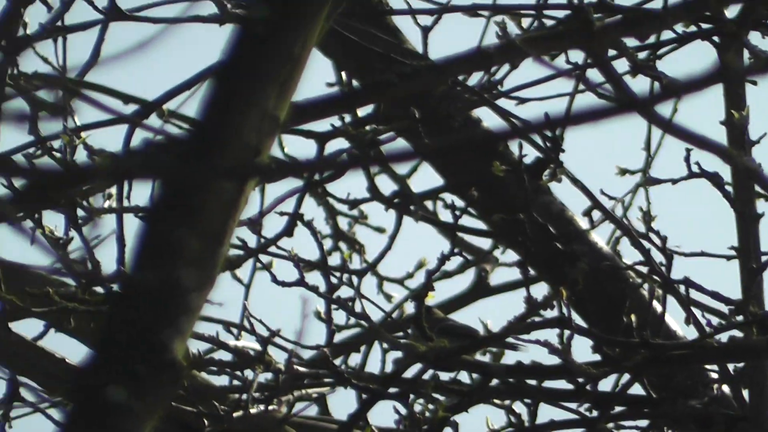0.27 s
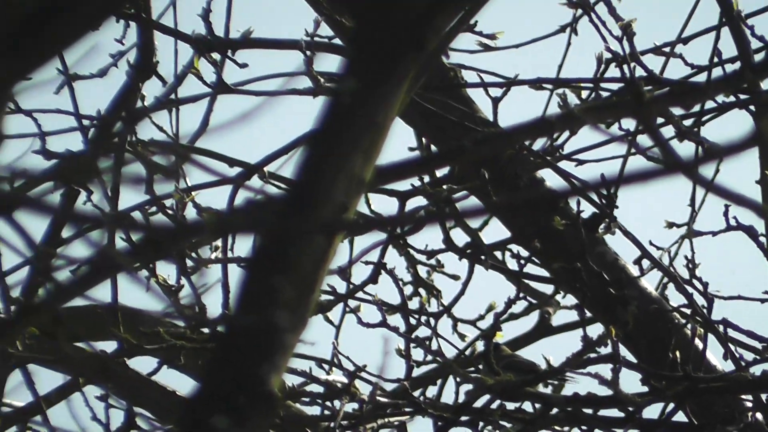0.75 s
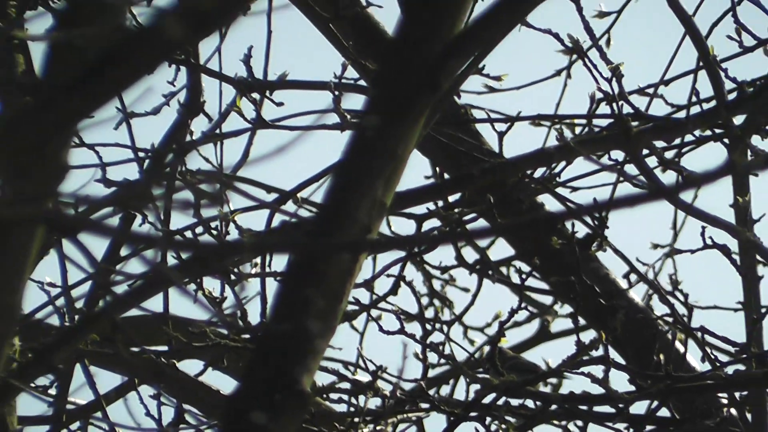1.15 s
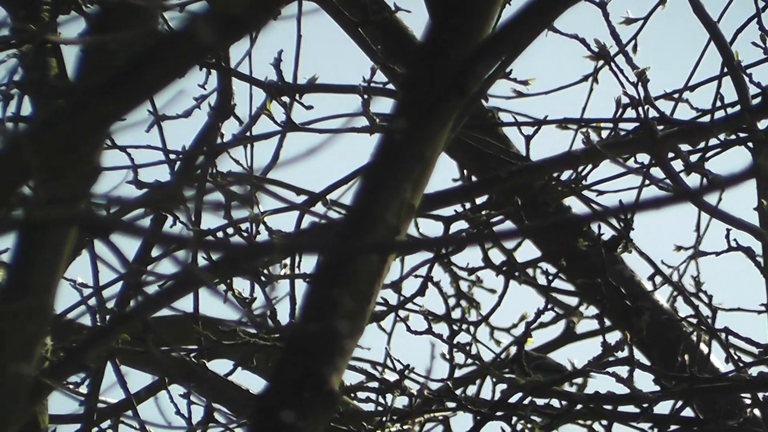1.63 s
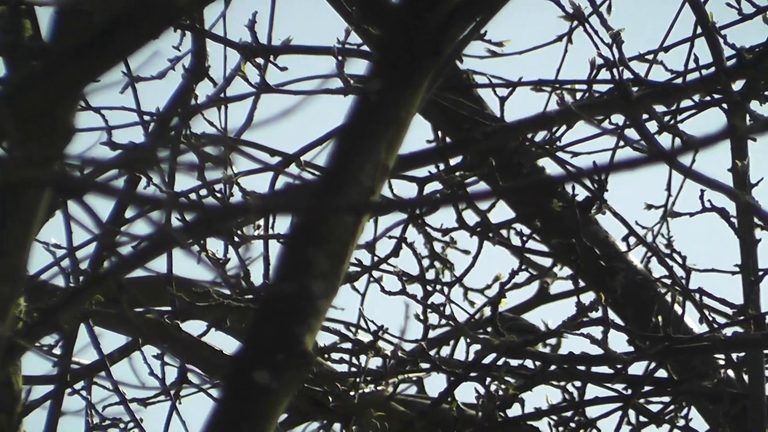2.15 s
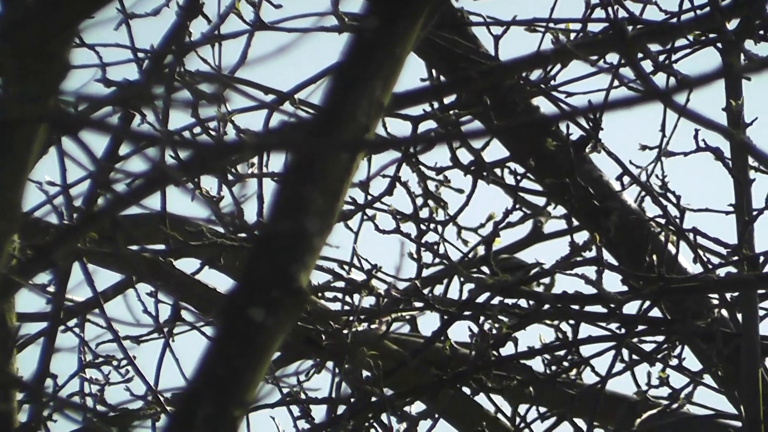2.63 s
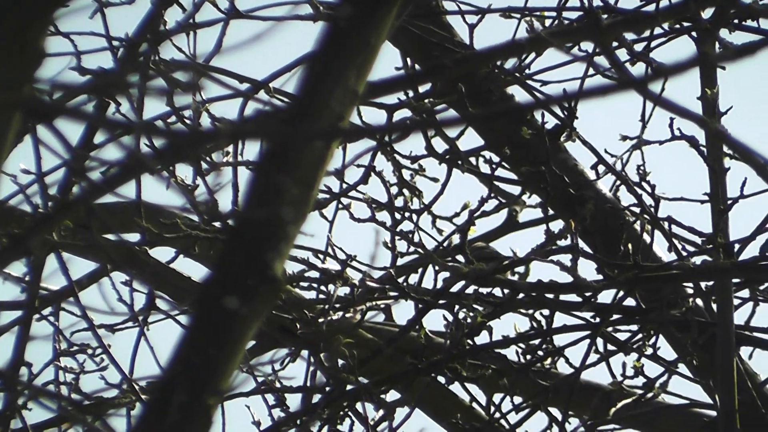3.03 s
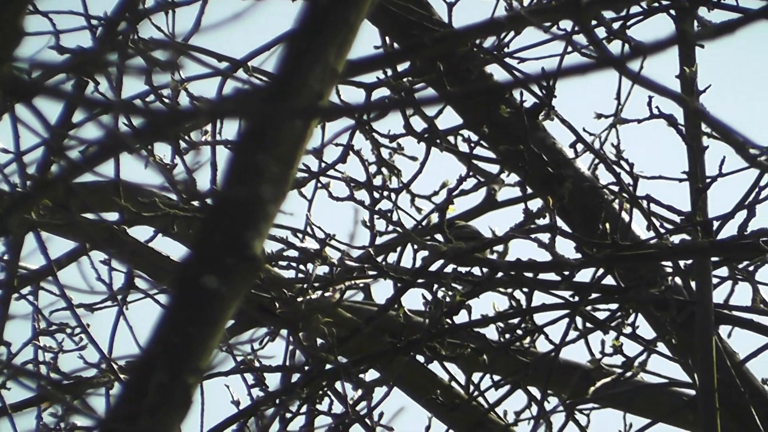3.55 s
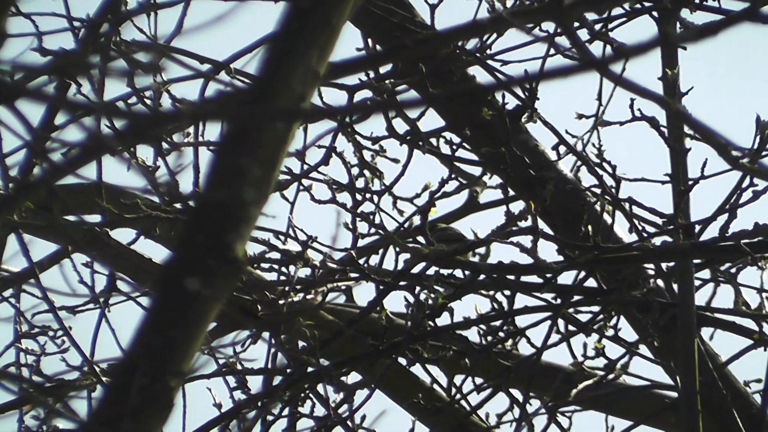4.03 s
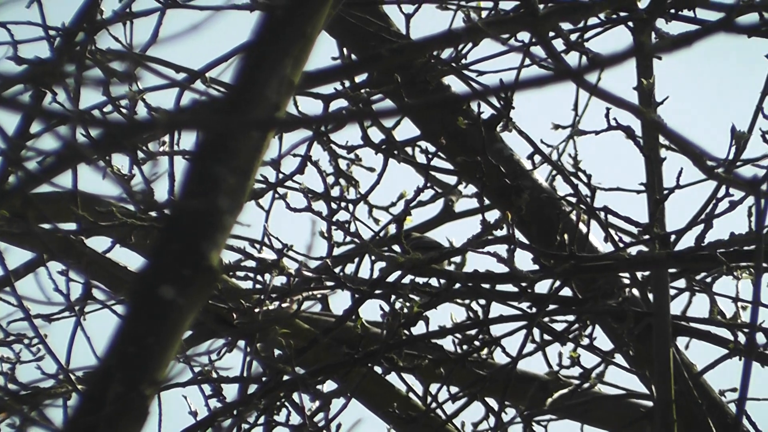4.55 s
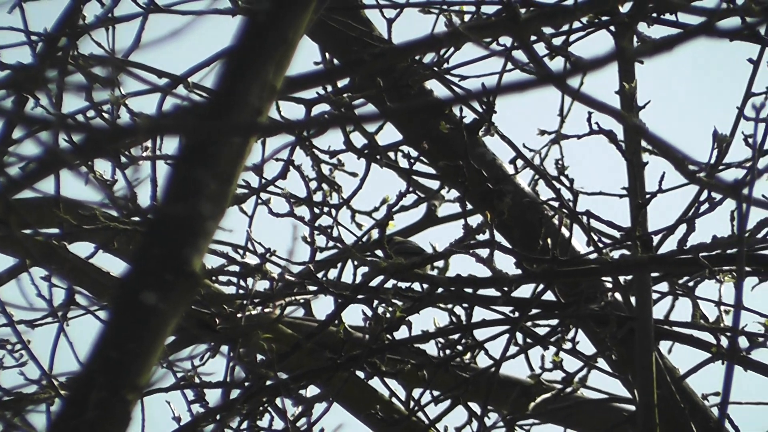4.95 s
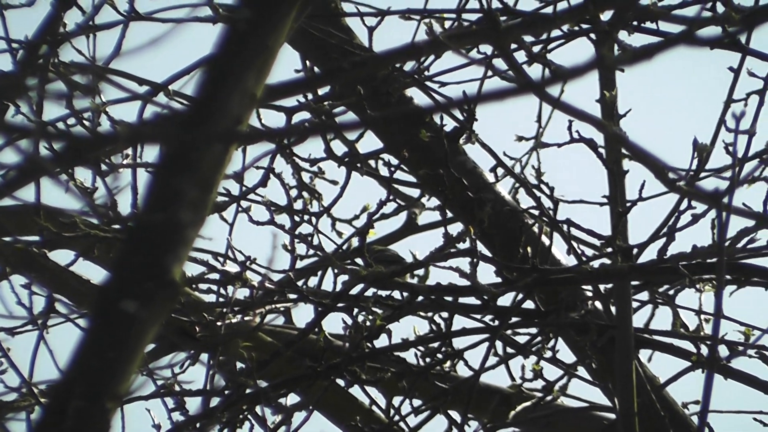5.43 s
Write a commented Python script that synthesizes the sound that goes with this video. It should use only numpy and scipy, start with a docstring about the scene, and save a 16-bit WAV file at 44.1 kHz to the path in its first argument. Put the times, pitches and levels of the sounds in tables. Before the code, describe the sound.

Outdoors among bare trees, a small songbird repeats a ringing two-note whistle, one note held, the other higher and falling. It pauses while a second bird carries on with quick trills, chirps and a short rasping buzz, then the two-note song returns. Both sound fairly near the microphone, with a light echo. Distant birds answer faintly over a steady town rumble and a weak machine hum.

```python
"""A great tit sings its two-note song in bare branches: a low held note in turn with a high falling one.
A finch nearby trills, slurs and buzzes; a far tit answers amid distant chatter.
Each voice is a near-sine whistle, heard directly and through scatter from the woods; the two near birds
also echo off trunks and walls. Three soft puffs of air pass, and machine hums and town rumble
lie under it all."""
import sys
import numpy as np
from scipy import signal
from scipy.fft import rfft, irfft
from scipy.io import wavfile

SR = 44100
rng = np.random.default_rng(int(sys.argv[2]) if len(sys.argv) > 2 else 0)


def transcribe(u):
    """Save the signal u as a 16-bit wav file named by the first command-line argument.

    u: samples, shape (n,) or (channels, n), limited to [-1, 1]; the rate is SR.
    q: integer samples, one column per channel.
    """
    v = np.clip(np.atleast_2d(u).T, -1, 1)
    q = np.round(v * 32767).astype(np.int16)
    wavfile.write(sys.argv[1], SR, q)


N = 250488
GLIDE_BEND, HOOK_BEND = 0.69, 1.8   # the larger the bend, the earlier the pitch moves


def tit_held_notes():
    """The great tit's low note: a clean whistle that settles on its pitch and dips briefly in level."""
    # Each row: start and length in seconds, entry and held pitch in Hz, level in dB,
    # time of the dip within the note in seconds, its depth in dB.
    notes = [(.105, 0.17, 3765, 3958, -35.5, 0.14, 5), (0.592, 0.17, 3850, 3920, -35.5, 0.11, 9),
             (1.095, 0.19, 4026, 3988, -37, 0.15, 16), (4.602, 0.1576, 3960, 3913, -39.5, 0.137, 9),
             (5.063, .17, 4018, 3920, -35, 0.12, 11), (5.529, 0.16, 3990, 3950, -37.5, 0.076, 2)]
    attack_s, release_s, settle_s, dip_width_s = .05, .023, .02, .011
    out, waver_hz = np.zeros(N), 18 * drift(45)
    for start, length, entry_hz, held_hz, db, dip_s, depth_db in notes:
        t = np.arange(0, length, 1 / SR)
        ramp = np.clip(np.minimum(t / attack_s, (length - t) / release_s), 0, 1)
        fade = np.sin(np.pi / 2 * ramp) ** 2
        dip_db = depth_db * np.exp(-((t - dip_s) / dip_width_s) ** 2)
        hz = held_hz + (entry_hz - held_hz) * np.exp(-t / settle_s)
        hz += np.interp((start + t) * SR, np.arange(N), waver_hz)
        add_tone(out, start, hz, fade * amp(db - dip_db), overtones_db=(-34.5, -37))
    return out * amp(2.2 * drift(30))


def tit_falling_notes():
    """The great tit's high note: a whistle that drops steeply, then sags, fluttering in pitch and level."""
    # Each row: start in seconds, the pitch it sags through in Hz, level in dB.
    notes = [(-.008, 5314, -44.5), (0.363, 5232, -36.5), (.844, 5230, -35.5), (1.358, 5203, -34.5),
             (4.846, 5178, -35.5), (5.315, 5295, -33)]
    length_s, attack_s, sag = .076, .003, .02
    out, flutter_hz = np.zeros(N), 80 * drift(150)
    for start, to_hz, db in notes:
        hz, swell = slur(length_s, from_hz=6850, to_hz=to_hz, bend=19, edge=.35)
        hz *= np.linspace(1 + sag, 1 - sag, len(hz))
        hz += flutter_hz[round(abs(start) * SR):][:len(hz)]
        onset = np.minimum(np.arange(len(hz)) / (attack_s * SR), 1)
        add_tone(out, start, hz, swell * onset * amp(db), overtones_db=(-37, -33))
    return out * (1 + .55 * drift(120))


def finch_song():
    """Trill syllables, held whistles and quick slurs; a fast tremble makes them slightly hoarse."""
    # The trill. Each row: a syllable's start in seconds, level in dB.
    trill = [(0.206, -42.5), (0.304, -41.5), (0.39, -41), (0.478, -40), (0.569, -39), (0.663, -41.5),
             (0.754, -42), (3.936, -45.5), (4.028, -43)]
    # A syllable's three strokes. Each row: delay and length in seconds, first and last pitch in Hz,
    # bend, relative level in dB.
    syllable = [(0., .007, 8260, 5870, 1.0, -11), (0.016, .026, 4540, 5560, 1, -3),
                (0.039, .022, 4200, 2750, 1.0, -2)]
    # Held whistles. Each row: start and length in seconds, pitch in Hz, level in dB.
    held = [(0., .019, 7020, -54.5), (2.024, .063, 7050, -64.5), (2.308, .1, 7010, -61),
            (2.694, .04, 5670, -48.5), (2.769, 0.1, 2980, -63.5), (2.806, 0.056, 5810, -53.5),
            (3.173, 0.022, 6195, -51), (3.199, 0.021, 6530, -57.5), (3.383, 0.028, 6530, -46.5),
            (3.454, 0.025, 6650, -50), (3.631, 0.038, 6330, -47), (3.703, 0.025, 5226, -39),
            (3.816, 0.017, 6880, -48), (3.957, 0.015, 6640, -64), (4.042, .012, 6600, -62)]
    # Nearly even glides. Each row: start and length in seconds, first and last pitch in Hz, level in dB.
    glides = [(.033, 0.06, 2556, 3270, -52), (.07, 0.019, 2860, 3500, -55),
              (.085, 0.029, 6270, 6890, -51.5), (.125, 0.025, 2520, 3930, -48.5),
              (.147, 0.018, 4200, 5330, -38), (.858, 0.031, 6360, 7580, -52.5),
              (.93, .0074, 7350, 6000, -47), (.951, 0.045, 5580, 4530, -42.5),
              (1.194, 0.023, 8600, 8030, -64), (1.226, 0.014, 8600, 7580, -58),
              (2.304, 0.015, 5680, 8350, -57.5), (2.397, 0.024, 3060, 4660, -43),
              (2.511, 0.019, 3010, 3780, -44.5), (2.547, .009, 6550, 5270, -59),
              (2.598, 0.015, 2980, 4950, -41), (2.822, 0.025, 4210, 4990, -41.5),
              (3.022, 0.025, 2650, 3180, -58), (3.119, 0.022, 2870, 3680, -47.5),
              (3.236, .012, 2160, 6230, -44.5), (3.452, .041, 5280, 5850, -47.5),
              (3.514, 0.015, 2450, 5430, -46), (3.746, 0.0065, 3500, 1770, -62),
              (3.865, 0.03, 2930, 5500, -41.5), (4.135, 0.014, 6110, 2950, -48)]
    # Hooks glide early and level off. Rows as for the glides.
    hooks = [(.849, 0.052, 8570, 7900, -55.5), (.979, .21, 4067, 3037, -43.5),
             (1.984, .061, 6880, 7880, -67.5), (2.125, 0.055, 6060, 6890, -58),
             (2.132, 0.037, 7100, 7950, -68), (2.444, 0.015, 5570, 6840, -56),
             (2.488, 0.015, 6250, 6750, -53), (2.697, 0.036, 6970, 7450, -62.5),
             (2.918, 0.026, 2320, 2830, -57.5), (3.174, 0.021, 8300, 7500, -63),
             (3.32, .035, 3030, 4710, -42.5), (3.562, 0.033, 2870, 4510, -41),
             (3.617, 0.043, 7830, 8220, -61.5), (3.7, 0.026, 6570, 6900, -52),
             (3.759, 0.024, 2440, 2920, -52)]
    scoop = .03   # a held whistle starts this share below its pitch
    strokes = [(start + delay, *shape, db + relative_db)
               for start, db in trill for delay, *shape, relative_db in syllable]
    strokes += [(start, length, hz * (1 - scoop), hz, HOOK_BEND, db) for start, length, hz, db in held]
    strokes += [(*glide, GLIDE_BEND, db) for *glide, db in glides]
    strokes += [(*hook, HOOK_BEND, db) for *hook, db in hooks]
    hoarseness = 1 + .16 * drift(220)
    return whistles(strokes, edge=.78, waver_hz=66.8, overtones_db=(-34,)) * hoarseness


def finch_buzz():
    """A rapid train of falling two-voiced strokes, roughened into a rasp that fades towards its end."""
    # A stroke's two voices. Each row: delay and length in seconds, first and last pitch in Hz,
    # bend, relative level in dB.
    voices = [(0., .016, 7320, 3080, 0.773, 3), (0.011, 0.016, 6680, 3560, 0.47, -5.5)]
    fade_s, fade_db = (4.161, 4.35, 4.51), (-49, -49.5, -57.5)
    strokes_per_s, jitter_s = 35.7, .00045
    strokes = []
    for beat in np.arange(fade_s[0], fade_s[-1], 1 / strokes_per_s):
        db = np.interp(beat, fade_s, fade_db)
        for delay, *shape, relative_db in voices:
            strokes.append((beat + delay + rng.normal(0, jitter_s), *shape, db + relative_db))
    rasp = .7 + .5 * drift(900)
    return whistles(strokes, edge=.5, waver_hz=150) * rasp


def far_birds():
    """A distant tit whistles level notes on two pitches while other birds chatter; both flicker."""
    # The far tit. Each row: start in seconds, pitch in Hz, level in dB.
    notes = [(.83, 4280, -54.5), (1.305, 4270, -56.5), (1.775, 4285, -59.5), (1.99, 3770, -66.5),
             (2.255, 4285, -61), (2.765, 4300, -62), (2.985, 3760, -65.5)]
    # The chatter. Each row: start and length in seconds, first and last pitch in Hz, level in dB.
    chirps = [(1.35, 0.042, 3716, 2986, -45), (1.373, 0.029, 3180, 3310, -56),
              (1.401, .042, 4290, 3460, -51), (1.456, 0.054, 3115, 2760, -55),
              (1.482, .015, 4710, 3370, -46.5), (1.53, 0.018, 3950, 3890, -52),
              (1.596, 0.023, 3410, 2944, -53.5), (1.601, .025, 4060, 3870, -57),
              (1.649, 0.024, 4910, 4500, -55.5), (1.69, .022, 5800, 5650, -68),
              (1.725, 0.014, 5000, 4420, -52.5), (1.743, 0.0132, 4590, 3200, -58),
              (1.644, 0.203, 3180, 3040, -65), (1.763, 0.04, 3470, 3310, -62),
              (1.89, 0.027, 4590, 4400, -62.5)]
    note_s = .14
    answer = whistles([(start, note_s, hz, hz, 0, db) for start, hz, db in notes], edge=.4, waver_hz=12)
    chatter = whistles([(*chirp, GLIDE_BEND, db) for *chirp, db in chirps], edge=.6, waver_hz=35)
    return (answer + chatter) * amp(3 * drift(35))


def whistles(strokes, edge, waver_hz, overtones_db=()):
    """Whistles each stroke (start, length, first pitch, last pitch, bend, level) with a waver."""
    out, waver = np.zeros(N), waver_hz * drift(118)
    for start, *shape, db in strokes:
        hz, swell = slur(*shape, edge)
        hz += waver[round(start * SR):][:len(hz)]
        add_tone(out, start, hz, swell * amp(db), overtones_db)
    return out


def slur(length, from_hz, to_hz, bend, edge):
    """Pitch curve and swell of one stroke; a smaller edge starts and stops it more abruptly."""
    progress = np.arange(round(length * SR)) / (length * SR)
    bend = max(bend, .01)
    hz = from_hz + (to_hz - from_hz) * np.expm1(-bend * progress) / np.expm1(-bend)
    return hz, np.sin(np.pi * progress) ** edge


def add_tone(out, start, hz, gain, overtones_db=()):
    """Mixes in a sine from pitch and rms gain per sample, with overtones from the second harmonic up."""
    phase = 2 * np.pi * (np.cumsum(hz) / SR + rng.random())
    wave = np.sin(phase) + sum(amp(db) * np.sin(k * phase) for k, db in enumerate(overtones_db, 2))
    at = round(start * SR) + np.arange(len(hz))
    inside = (at >= 0) & (at < N)
    out[at[inside]] += (np.sqrt(2) * gain * wave)[inside]


def woods(voice, echoes, scatter_db, t60_s, likeness, pan_db):
    """Direct sound, single echoes off trunks and walls, and a dying tail of scatter."""
    t = np.arange(SR) / SR
    build_up = np.minimum(t / .0079, 1)
    tail = stereo(*rng.standard_normal((2, SR)), likeness) * build_up * amp(-60 * t / t60_s)
    response = amp(scatter_db) * tail / np.sqrt(np.sum(tail ** 2) / 2)
    for delay, db, tilt_db in echoes:
        response[:, round(delay * SR)] += amp([db + tilt_db / 2, db - tilt_db / 2])
    dulling = signal.butter(2, 14100, fs=SR, output="sos")   # bark and air dull what is thrown back
    response = signal.sosfilt(dulling, response)
    response[:, 0] = 1   # the direct sound
    pan = amp([[pan_db / 2], [-pan_db / 2]])
    return pan * signal.fftconvolve(voice[None], response, axes=1)[:, :N]


def air_puffs():
    """Soft bursts of mid-band air noise, like wing beats."""
    # Each row: start and length in seconds, level in dB.
    puffs = [(1.855, 0.11, -53), (1.949, 0.08, -53), (2.014, 0.1, -51.5)]
    envelope = np.zeros(N)
    for start, length, db in puffs:
        size = round(length * SR)
        envelope[round(start * SR):][:size] = amp(db) * np.sqrt(np.hanning(size))
    band = signal.butter(3, (910, 2430), "band", fs=SR, output="sos")
    return envelope * rms_one(signal.sosfilt(band, rng.standard_normal((2, N))))


def machine_hums():
    """Thin machine tones, hums blurred into narrow noise, and a rising drone that swells and fades."""
    # Thin tones. Each row: pitch in Hz, level in dB.
    thin = [(527.6, -69), (839.8, -71.5), (2525, -80.5)]
    # Blurred hums. Each row: pitch and width in Hz, level in dB.
    blurred = [(250, 23, -64.5), (1074, 29, -70)]
    drone_hz, rise_hz_per_s, drone_width_hz = 505.5, 45, 22
    peak_db, peak_s, swell_s = -59, 3.65, .78
    out = np.zeros(N)
    for hz, db in thin:
        add_tone(out, 0, hz + 2 * drift(3.1), amp(db + 2 * drift(4)))
    for hz, width_hz, db in blurred:
        add_tone(out, 0, np.full(N, hz), amp(db) * drift(width_hz))
    from_peak_s = np.arange(N) / SR - peak_s
    swell = amp(peak_db) * np.exp(-(from_peak_s / swell_s) ** 2)
    rising_hz = drone_hz + rise_hz_per_s * from_peak_s
    add_tone(out, 0, rising_hz, swell * drift(drone_width_hz), overtones_db=(-12,))
    return out


def town_rumble():
    """A wide, smooth noise bed of far traffic and air; the lows swell gently under steady highs."""
    # The bed's colour. Each row: frequency in Hz, relative spectral density in dB.
    spectrum = [(18, -29), (30, -4), (301, 2), (423, 1.5), (880, -5), (1880, -15.5), (2200, -19),
                (2790, -21.5), (3010, -25), (3260, -20.5), (3720, -13), (4710, -25.5), (5960, -30),
                (12100, -35), (15700, -37.5)]
    # Its stereo image. Each row: frequency in Hz, left-right likeness from 0 to 1.
    image = [(30, .14), (70, 0.49), (300, 0.31), (1000, 0.15), (3000, 0.15), (7000, 1), (12000, .35)]
    # The swell of the lows. Each row: time in seconds, gain in dB.
    swell = [(0, -51.5), (2.3, -51.5), (2.7, -53), (3.85, -50), (4.248, -51.5), (5.68, -51.5)]
    split_hz, highs_db = 1200, -51
    colour = amp(over_frequency(spectrum))
    mid, side = rfft(rng.standard_normal((2, N)))
    bed = rms_one(irfft(colour * stereo(mid, side, over_frequency(image)), N))
    lows = signal.sosfilt(signal.butter(1, split_hz, fs=SR, output="sos"), bed)
    lows_db = np.interp(np.arange(N) / SR, *np.transpose(swell))
    pan = amp([[.4], [-.4]])
    return pan * (amp(lows_db) * lows + amp(highs_db) * (bed - lows))


def over_frequency(points):
    """Joins (Hz, value) points along a log-frequency axis, giving one value per FFT bin."""
    hz, values = np.transpose(points)
    bins_hz = np.maximum(np.arange(N // 2 + 1) * SR / N, 1)
    return np.interp(np.log(bins_hz), np.log(hz), values)


def stereo(mid, side, likeness):
    """Blends two noises into left and right: unrelated at likeness 0, the same at 1."""
    return np.sqrt(1 + likeness) * mid + np.sqrt(1 - likeness) * side * [[1], [-1]]


def drift(rate_hz):
    """A smooth random wander of rms about 1: noise passed twice through a one-pole low-pass."""
    pole = np.exp(-2 * np.pi * rate_hz / SR)
    wander = signal.lfilter([1], [1, -2 * pole, pole * pole], rng.standard_normal(N + SR))
    return rms_one(wander)[SR:]


def rms_one(x):
    """Scales to rms 1."""
    return x / np.sqrt(np.mean(x ** 2) + 1e-20)


def amp(db):
    """Turns dB into gain."""
    return 10 ** (np.asarray(db) / 20)


def scene():
    """The singers in their places among the trees, over the sound of the town."""
    # Each near bird's echoes. Each row: delay in seconds, level in dB, left minus right in dB.
    tit_echoes = [(.003, -18, 9), (.008, -13, -1), (0.015, -24.5, 10.5), (0.021, -27, 2.5), (0.13, -13, -1)]
    finch_echoes = [(.007, -2, 0.77), (.016, -11, -1), (.021, -13, -1.0)]
    tit = tit_held_notes() + tit_falling_notes()
    birds = woods(tit, tit_echoes, scatter_db=-7, t60_s=.42, likeness=.72, pan_db=1)
    finch = finch_song() + finch_buzz()
    birds += woods(finch, finch_echoes, scatter_db=-1.17, t60_s=.4, likeness=.83, pan_db=.7)
    birds += woods(far_birds(), [], scatter_db=0, t60_s=.88, likeness=.85, pan_db=.6)
    return birds + air_puffs() + town_rumble() + machine_hums()


def record(dry):
    """Cuts the deepest bass gently and the very top steeply."""
    low_cut = signal.butter(2, 40, "high", fs=SR, output="sos")
    high_cut = signal.ellip(12, .5, 70, 15750, fs=SR, output="sos")
    return signal.sosfilt(high_cut, signal.sosfilt(low_cut, dry))


dry = scene()
out = record(dry)
transcribe(out)
```